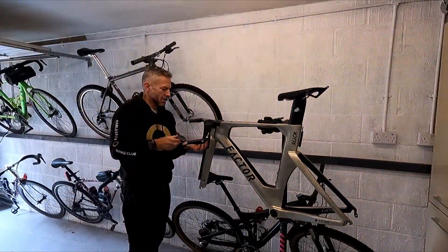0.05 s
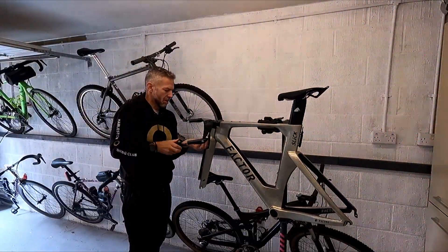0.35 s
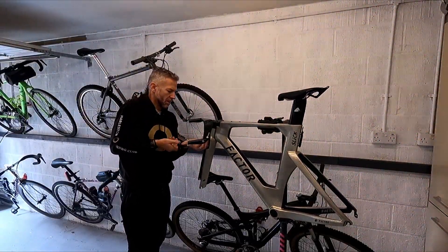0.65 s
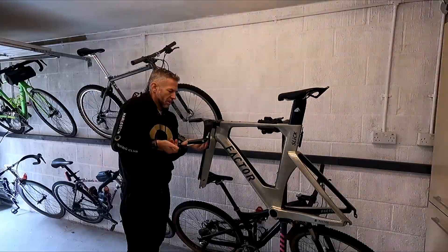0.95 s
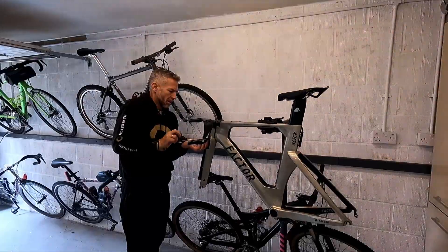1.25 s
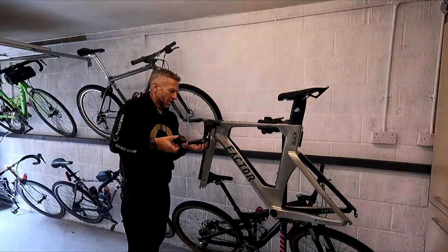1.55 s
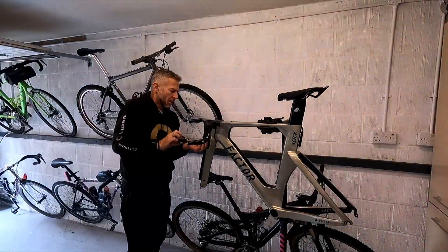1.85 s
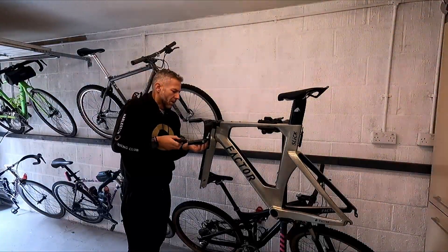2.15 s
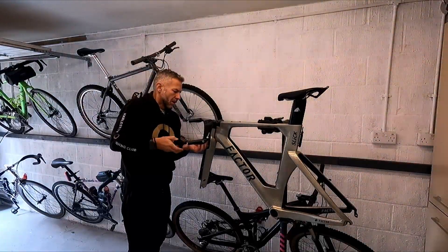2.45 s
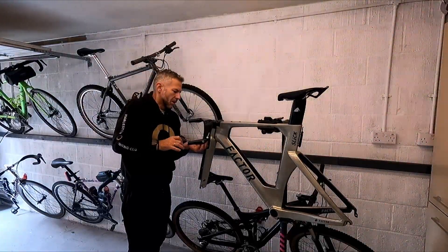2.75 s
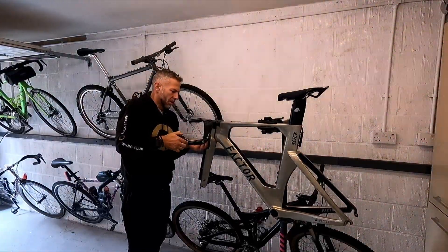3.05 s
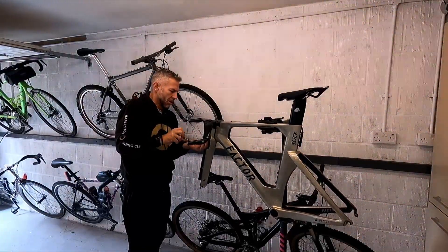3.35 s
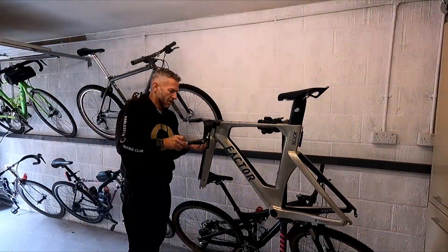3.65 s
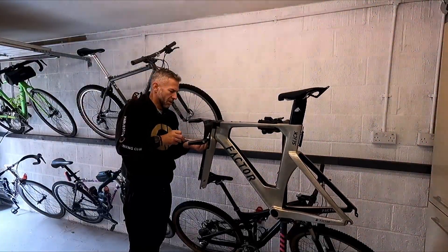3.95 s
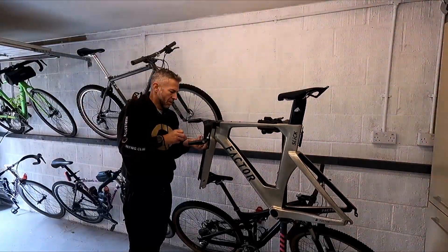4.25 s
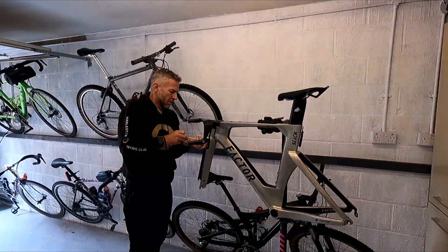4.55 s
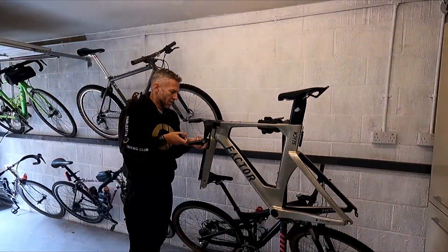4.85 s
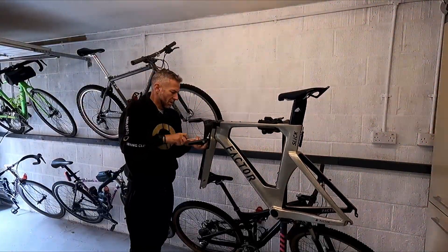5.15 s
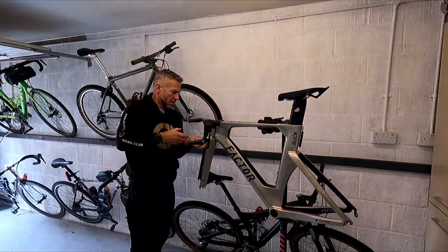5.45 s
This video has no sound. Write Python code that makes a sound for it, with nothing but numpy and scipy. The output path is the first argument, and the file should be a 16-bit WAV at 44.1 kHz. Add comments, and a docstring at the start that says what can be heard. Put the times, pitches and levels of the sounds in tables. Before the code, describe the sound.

Bicycle parts tick, scrape and thud as they are worked loose, ending in two hard snaps in an echoing garage.

```python
"""Light ticks and slides of bicycle parts worked loose by hand, a few metres off in a bare garage.
The frame thuds on its stand, a part scrapes out of its tube, a small steel tool clinks,
then a fitting and a cover let go with hard snaps. Blows ring the parts; friction is a swarm of slips.
Block walls give the contacts a bright half-second tail; a faint hum lies underneath."""
import sys
import numpy as np
from scipy import signal
from scipy.fft import rfft, irfft, next_fast_len
from scipy.io import wavfile
from scipy.ndimage import uniform_filter1d

SR = 44100
rng = np.random.default_rng(int(sys.argv[2]) if len(sys.argv) > 2 else 0)


def log_audio(samples):
    """Write samples as a 16-bit WAV file to the path given in sys.argv[1]."""
    # one column per channel
    frames = np.atleast_2d(samples).T
    # limit to full scale, then quantise
    limited = np.clip(frames, -1, 1)
    pcm = np.round(limited * 32767).astype(np.int16)
    wavfile.write(sys.argv[1], SR, pcm)


N = 247401
TIME = np.arange(N) / SR


def from_db(db):
    """Decibels to gain."""
    return 10 ** (np.asarray(db) / 20)


def rms_one(x):
    """Scale to rms 1."""
    return x / np.sqrt(np.mean(x ** 2) + 1e-20)


def at_level(x, db):
    """Give a short sound the energy of 10 ms at this level."""
    return x * from_db(db) * np.sqrt(SR / 100 / np.sum(x ** 2))


def at_hz(points, hz):
    """Read a table on a log-frequency axis."""
    points_hz, values = np.transpose(points)
    return np.interp(np.log(np.maximum(hz, 1)), np.log(points_hz), values)


def add(track, start_s, sound):
    """Mix a short sound into a track."""
    start = max(round(start_s * SR), 0)
    track[start:start + len(sound)] += sound[:N - start]


def edges_of(hz, octaves):
    """Low and high edge of a band around a pitch."""
    return hz * 2 ** (-octaves / 2), hz * 2 ** (octaves / 2)


def band(x, low_hz, high_hz):
    """Causal band-pass."""
    edges_hz = np.clip([low_hz, max(high_hz, low_hz * 1.1)], 10, .45 * SR)
    return signal.sosfilt(signal.butter(2, edges_hz, "band", fs=SR, output="sos"), x + 1e-18)


def hump(hz, low_hz, high_hz):
    """Power spectrum of a second-order band, total 1."""
    power = 1 / (1 + ((hz - low_hz * high_hz / hz) / max(high_hz - low_hz, 20)) ** 4)
    return power / power.sum()


def shaped(x, gain_at):
    """Minimum-phase filter with gain gain_at(Hz): nothing sounds early."""
    size = 2 * next_fast_len(x.shape[-1] // 2 + 2048)
    hz = np.maximum(np.fft.rfftfreq(size, 1 / SR), 10)
    cepstrum = irfft(np.log(gain_at(hz)))
    cepstrum[1:size // 2] *= 2
    cepstrum[size // 2 + 1:] = 0
    return irfft(rfft(x, size) * np.exp(rfft(cepstrum)))[..., :x.shape[-1]]


def coloured(x, spectrum):
    """Filter by a table of (frequency [Hz], gain [dB])."""
    return shaped(x, lambda hz: from_db(at_hz(spectrum, hz)))


def evened(x, width_hz=60):
    """Flatten a blow's spectrum, keeping its spread in time."""
    power = uniform_filter1d(np.abs(rfft(x)) ** 2, max(round(width_hz * len(x) / SR), 1))
    return shaped(x, lambda hz: np.interp(hz, np.fft.rfftfreq(len(x), 1 / SR), power) ** -.5)


def resonances(force, modes):
    """Parallel two-pole resonators."""
    out = np.zeros(len(force))
    for hz, width_hz, db in modes:
        r = np.exp(-np.pi * width_hz / SR)
        poles = [1, -2 * r * np.cos(2 * np.pi * hz / SR), r * r]
        out += from_db(db) * (1 - r * r) / 2 * signal.lfilter([1, 0, -1], poles, force + 1e-18)
    return out


def stereo_noise(size, correlation):
    """White noise, partly shared by the two ears."""
    mid, side = rng.standard_normal((2, size))
    return np.sqrt((1 + correlation) / 2) * mid + np.sqrt((1 - correlation) / 2) * np.array([side, -side])


def still_air(level_db=-63.5):
    """Room noise with a faint whir and a two-tone hum."""
    # air spectrum: (frequency [Hz], gain [dB])
    spectrum = [(25, -14.5), (60, -11), (100, -28), (150, 0), (210, 0.5), (300, -6.5), (600, -18.5),
                (1250, -21.5), (2000, -23), (2800, -28), (3700, -34.5), (7700, -32), (9200, -50),
                (14000, -59)]
    # whir resonances: (frequency [Hz], width [Hz], gain [dB])
    whir = [(1060, 19, 9.5), (1278, 157, 7), (2760, 110, 8)]
    # hum: (frequency [Hz], level [dB])
    tones = [(156, -73), (199.5, -69)]
    air = coloured(stereo_noise(N, correlation=0.57), spectrum)
    air = air + np.array([resonances(ear, whir) for ear in air])
    hum = sum(from_db(db) * np.sqrt(2) * np.sin(2 * np.pi * (hz * TIME + rng.random())) for hz, db in tones)
    return from_db(level_db) * rms_one(air) + hum


def hiss(level_db=-69.5, dip_s=4.26, dip_width_s=0.22, dip_db=38):
    """Soft hiss that fades briefly near 4.3 s."""
    # hiss spectrum: (frequency [Hz], gain [dB])
    spectrum = [(300, 9), (1400, 12), (2300, 8), (3600, 0.5), (7700, 2), (9200, -9), (14000, -19.5)]
    dip = np.exp(-((TIME - dip_s) / dip_width_s) ** 2 / 2)
    noise = rms_one(coloured(stereo_noise(N, correlation=0.46), spectrum))
    return from_db(level_db - dip_db * dip) * noise


def rumble(trim_db=-4):
    """Deep noise, strongest early on."""
    # envelope: (time [s], level before trim [dB])
    envelope = [(0.0, -59), (0.08, -43.5), (0.14, -52.5), (0.64, -78), (1.09, -36), (1.46, -60), (1.5, -49),
                (1.65, -66), (1.84, -64), (1.9, -87), (2.12, -65), (2.5, -74), (2.67, -59), (2.76, -71),
                (4.88, -73), (5.12, -89), (5.6, -92)]
    # rumble spectrum: (frequency [Hz], gain [dB])
    spectrum = [(15, 7), (28, 14), (42, -4), (60, -21), (90, -41), (200, -77)]
    noise = rms_one(coloured(stereo_noise(N, correlation=0.95), spectrum))
    return from_db(trim_db + np.interp(TIME, *np.transpose(envelope))) * noise


def garage(x, direct_db, tail_db=-1.5, build_s=0.0075):
    """Direct sound, hard wall reflections, then a dense tail, new each call, whose treble dies first."""
    # tail decay: (frequency [Hz], T60 [s])
    t60 = [(100, 0.7), (350, 0.59), (800, 0.46), (2000, 0.44), (5000, 0.42), (8000, 0.45), (13000, 0.11)]
    # first reflections: (delay [s], gain [dB], left minus right [dB])
    echoes = [(.0026, -10.5, -10), (.0056, -7, 1), (.0098, -12.5, 4), (0.0217, -11, -10), (0.0322, -27, -9)]
    # overall tone, treble dulled above 8 kHz: (frequency [Hz], gain [dB])
    tone = [(100, -5), (5000, -2), (8100, -11.5), (9000, -18), (12500, -12.5), (15000, -28)]
    t, edges_hz = TIME[:SR], np.geomspace(60, 18000, 13)
    white = [stereo_noise(len(t), correlation=0.7) for _ in range(2)]
    tail = sum(band(white[k % 2], low, high) * from_db(-60 * t / at_hz(t60, np.sqrt(low * high)))
               for k, (low, high) in enumerate(zip(edges_hz, edges_hz[1:])))
    tail *= 1 - np.exp(-t / build_s)
    response = from_db(tail_db) * tail / np.sqrt(np.sum(tail ** 2) / 2)
    response[:, 0] += from_db(direct_db)
    for delay_s, db, pan_db in echoes:
        response[:, round(delay_s * SR)] += from_db([db + pan_db / 2, db - pan_db / 2])
    return signal.fftconvolve(x[None], coloured(response, tone), axes=1)[:, :N]


def cloth():
    """Sleeves and hands brush: soft, dull swells without grit."""
    # brushes: (time [s], dry level [dB], swell [s], pitch [Hz])
    brushes = [(.109, -53, 0.017, 390), (1.15, -50.5, 0.023, 367), (2.605, -48.5, 0.031, 358),
               (3.0, -45.5, 0.028, 390), (3.836, -48.5, 0.049, 152)]
    out, t = np.zeros(N), TIME[:SR // 2]
    for start_s, db, swell_s, hz in brushes:
        swell = rng.standard_normal(len(t)) * t * np.exp(-t / swell_s)
        add(out, start_s, at_level(band(swell, *edges_of(hz, octaves=0.63)), db))
    return out


def frame_thuds(push_s=0.0018, judder_gain=0.11, judder_s=0.02):
    """The frame knocks on its stand: soft pushes with a short judder ring its low modes."""
    # knocks: (time [s], dry level [dB])
    knocks = [(0.898, -31.5), (0.96, -36), (1.051, -36), (1.108, -42.5)]
    # frame modes: (frequency [Hz], width [Hz], gain [dB])
    modes = [(110, 17, 3.5), (192, 30, -10), (274, 23, -3)]
    out, t = np.zeros(N), TIME[:SR // 2]
    for start_s, db in knocks:
        push = t / push_s * np.exp(-t / push_s)
        shake = rms_one(band(rng.standard_normal(len(t)), 141, 260))
        judder = judder_gain * shake * t / judder_s * np.exp(-t / judder_s)
        ringing = band(resonances(push + judder, modes), 104, 360)
        add(out, start_s, at_level(ringing, db))
    return out


def contact(force, low_hz, high_hz, crack_db, body_db):
    """Size sets a part's lowest pitch, hardness its highest; a thin crack on top, a dull knock below."""
    return shaped(force, lambda hz: np.sqrt(
        hump(hz, low_hz, high_hz)
        + from_db(crack_db) ** 2 * hump(hz, low_hz=3670, high_hz=10100)
        + from_db(body_db) ** 2 * hump(hz, low_hz=370, high_hz=720)))


def slips(size, per_s, spread_db):
    """Friction: tiny slips of uneven strength at random moments."""
    pulses = (rng.random(size) < per_s / SR) * rng.choice([-1, 1], size)
    return pulses * from_db(spread_db * rng.standard_normal(size))


def sliding_parts():
    """Parts slide on each other: each stroke is a swarm of slips that swells and dies."""
    # strokes: (time [s], dry level [dB], swell [s], pitch [Hz], grit [dB])
    strokes = [(.882, -37, 0.0041, 810, -14), (.945, -44, 0.0072, 1510, -12.5),
               (1.055, -46, 0.0019, 1700, -8), (1.250, -31, 0.012, 1440, -14),
               (1.485, -50, 0.017, 1470, -28), (1.742, -52.5, .009, 1620, -21.5),
               (1.80, -48.5, .047, 1430, -2), (2.02, -54, 0.041, 1670, -18),
               (2.29, -46.5, 0.028, 1280, -13), (2.335, -47, 0.021, 1600, 2.5),
               (2.755, -55.5, 0.027, 1970, 4), (3.25, -47, 0.0074, 800, -6),
               (3.335, -49.5, 0.0098, 1480, -6.5), (3.52, -55.5, 0.042, 1350, -30),
               (3.838, -30, .016, 1140, -11), (3.94, -46, 0.0022, 2000, -5),
               (4.895, -47.5, 0.029, 1920, -10), (5.475, -35.5, 0.014, 970, -9.5)]
    out, t = np.zeros(N), TIME[:SR // 2]
    for start_s, db, swell_s, hz, grit_db in strokes:
        force = slips(len(t), per_s=2600, spread_db=3.5) * t * np.exp(-t / swell_s)
        octaves = np.clip(2.64 + 0.1 * grit_db, .5, 2)   # grit widens the band
        rub = contact(force, *edges_of(hz, octaves), grit_db, body_db=-11)
        add(out, start_s, at_level(rub, db))
    return out


def drawn_part(start_s=2.86, length_s=0.47, rise_s=0.027, fall_s=0.21, dry_db=-41):
    """A tight part leaves its tube: friction rises, holds and falls, and keeps the tube ringing."""
    # tube modes: (frequency [Hz], width [Hz], gain [dB])
    modes = [(384, 150, 11), (1737, 107, 12.5), (3350, 330, 5), (4330, 640, -3)]
    out, t = np.zeros(N), TIME[:SR // 2]
    pressure = np.clip(np.minimum(t / rise_s, (length_s - t) / fall_s), 0, 1)
    force = pressure * slips(len(t), per_s=5000, spread_db=-0.5)
    rub = contact(force, low_hz=393, high_hz=2530, crack_db=-5.5, body_db=-10)
    add(out, start_s, at_level(rub + resonances(rub, modes), dry_db))
    return out


def strikes(blows, modes, octaves, body_db, chatter_gain, chatter_s):
    """An impulse and brief surface chatter per blow: a dry knock plus the part's ringing."""
    out, t = np.zeros(N), TIME[:SR // 5]
    for start_s, db, hz, crack_db in blows:
        chatter = chatter_gain * rng.standard_normal(len(t)) * np.exp(-t / chatter_s)
        force = evened(signal.unit_impulse(len(t)) + chatter)
        knock = contact(force, *edges_of(hz, octaves), crack_db, body_db)
        add(out, start_s, at_level(knock + resonances(knock, modes), db))
    return out


def light_taps():
    """Parts tick against each other without ringing."""
    # taps: (time [s], dry level [dB], pitch [Hz], crack [dB])
    taps = [(.3183, -58, 2660, -1), (.7727, -52.5, 1390, -34), (.887, -43, 2220, -9),
            (1.1269, -51.5, 1070, -31), (1.2596, -42.5, 2100, 7), (1.2735, -43, 1480, -4),
            (2.1351, -44, 1310, -10), (2.2975, -48, 1310, -6.5), (2.6305, -52.5, 1570, -30),
            (2.7213, -45.5, 1530, -8), (3.2421, -43, 1070, -11), (3.314, -44.5, 2070, -7.5),
            (3.848, -37, 1320, -28), (3.9035, -39, 990, -22), (4.076, -51, 920, -30),
            (4.702, -41, 850, -20), (4.760, -39, 820, -19.5)]
    ticks = strikes(taps, modes=[], octaves=1.28, body_db=-7, chatter_gain=0.17, chatter_s=0.0031)
    return garage(ticks, direct_db=-12)


def tool_clink():
    """A small steel tool touches, bounces and rings."""
    # touches: (time [s], dry level [dB], pitch [Hz], crack [dB])
    touches = [(3.9895, -36, 3320, -1.5), (3.9945, -38.5, 3670, -0.5)]
    # tool modes: (frequency [Hz], width [Hz], gain [dB])
    modes = [(686, 23, 17.5), (1900, 240, 9), (2610, 400, 7), (3740, 200, 4), (4400, 200, -5),
             (4820, 320, 6.5), (7530, 420, 10.5), (9450, 440, 6)]
    clinks = (strikes([touch], modes, octaves=1.3, body_db=-14.5, chatter_gain=0.21, chatter_s=0.0026)
              for touch in touches)
    return sum(garage(clink, direct_db=1) for clink in clinks)


def fitting_unclip():
    """The fitting creaks, then unclips and rings."""
    # creak and release: (time [s], dry level [dB], pitch [Hz], crack [dB])
    blows = [(4.6705, -38.5, 1620, -44), (4.9283, -20, 1574, -11)]
    # fitting modes: (frequency [Hz], width [Hz], gain [dB])
    modes = [(793, 85, 12), (1410, 27, -6), (1880, 70, 0), (2037, 170, 6.5), (2630, 190, 2.5),
             (3420, 690, 6), (4820, 100, 5), (7660, 350, 3.5), (9350, 310, 8)]
    clicks = strikes(blows, modes, octaves=1.31, body_db=-20, chatter_gain=0.089, chatter_s=0.0021)
    return garage(clicks, direct_db=-11)


def cover_snap():
    """The hollow cover snaps free catch by catch, each ringing its shell."""
    # catches: (time [s], dry level [dB], pitch [Hz], crack [dB])
    catches = [(5.2460, -20.5, 1590, -12.5), (5.2478, -15.5, 1780, -10), (5.2550, -21.5, 1940, -2)]
    # cover modes: (frequency [Hz], width [Hz], gain [dB])
    modes = [(482, 52, 11), (610, 170, 7), (780, 72, 13.5), (1300, 65, 1.5), (1880, 200, 3.5),
             (2220, 120, -6), (2443, 41, 9), (3515, 245, 7.5), (4200, 180, 2), (4780, 260, -2),
             (6440, 320, -4), (7670, 470, 5.5)]
    snaps = (strikes([catch], modes, octaves=1.33, body_db=-22.5, chatter_gain=0.15, chatter_s=0.004)
             for catch in catches)
    return sum(garage(snap, direct_db=-7) for snap in snaps)


def scene():
    """Work on the bike over the room noise; treble leans left, the thuds arrive mostly direct."""
    # left-channel tilt: (frequency [Hz], gain [dB])
    left_tilt = [(500, -0.5), (1200, 1.5), (2500, 0.13), (5000, 1.5), (8000, 6.5), (11000, 0)]
    impacts = light_taps() + fitting_unclip() + cover_snap() + tool_clink()
    friction = sliding_parts()
    thuds = frame_thuds()
    handling = garage(friction + drawn_part() + cloth() + from_db(-11.5) * thuds, direct_db=-11)
    left, right = impacts + handling + thuds
    return np.array([coloured(left, left_tilt), right]) + still_air() + hiss() + rumble()


def record(dry):
    """Steep low-pass at 15 kHz."""
    return signal.sosfilt(signal.ellip(10, .1, 80, 15000, fs=SR, output="sos"), dry)


dry = scene()
out = record(dry)
log_audio(out)
```